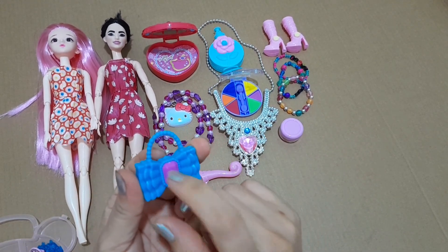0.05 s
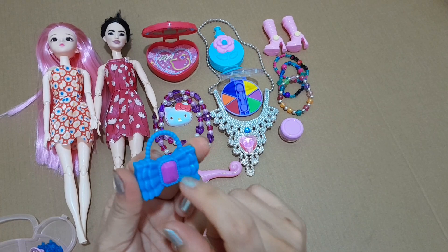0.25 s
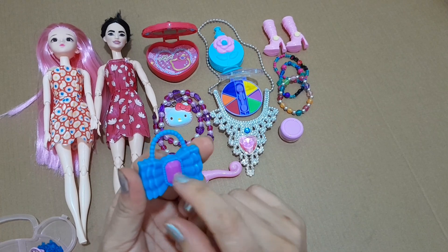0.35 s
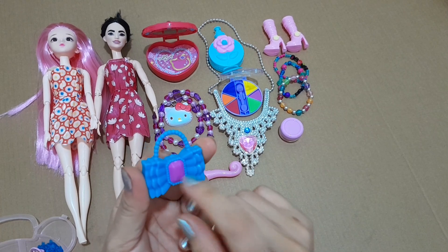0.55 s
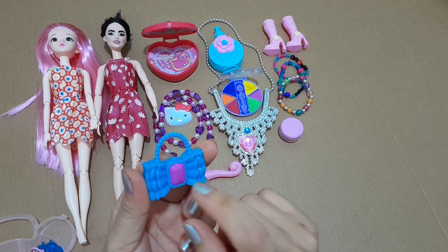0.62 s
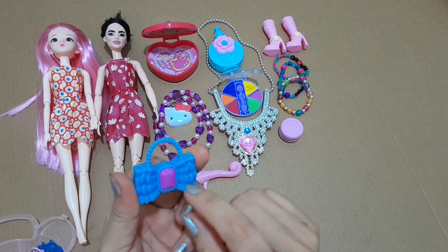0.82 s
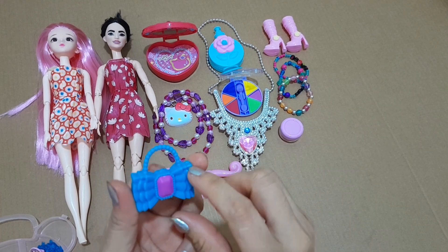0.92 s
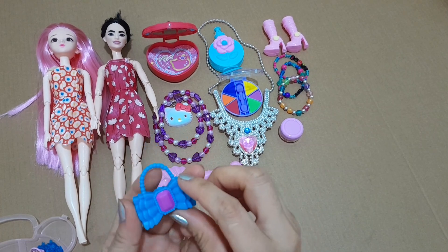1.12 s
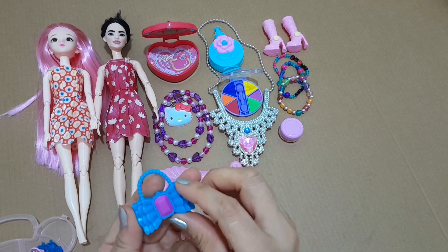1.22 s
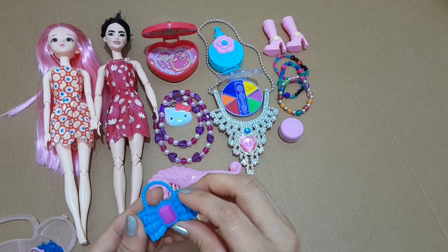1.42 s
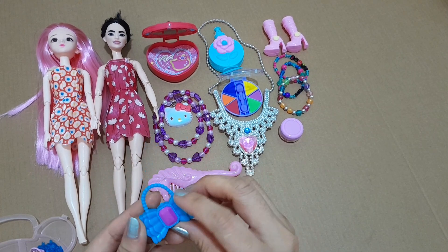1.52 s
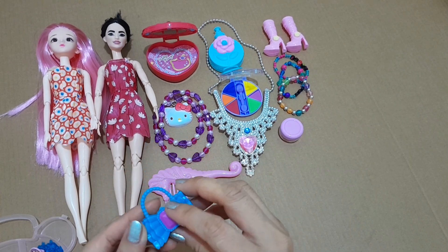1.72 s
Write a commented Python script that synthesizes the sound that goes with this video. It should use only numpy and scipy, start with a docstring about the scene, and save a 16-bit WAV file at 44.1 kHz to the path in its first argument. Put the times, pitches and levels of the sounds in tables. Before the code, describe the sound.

Four crisp fingernail clicks on a hard plastic toy handbag over soft room noise.

```python
"""Four sharp fingernail taps on a small hard plastic toy, close to a stereo microphone in a quiet, live room.
Each is a graze and a click that rings briefly near 4 kHz; a faint tick comes before them, and more follow
as the toy is turned in the fingers. Moving air buffets the two microphone ports separately.
Behind it all lie soft room noise, a drifting hollow band and a thin hiss."""
import sys
import numpy as np
from scipy import signal
from scipy.fft import rfft, irfft
from scipy.io import wavfile
from scipy.ndimage import uniform_filter1d

SR = 44100
rng = np.random.default_rng(int(sys.argv[2]) if len(sys.argv) > 2 else 0)


def unload_audio(sound):
    """Save the sound as a 16-bit wav file, at the path given as the first command line argument."""
    columns = np.transpose(np.atleast_2d(sound))
    # keep every value between -1 and 1, then stretch to whole-number steps
    steps = np.round(np.clip(columns, -1, 1) * 32767)
    wavfile.write(sys.argv[1], SR, steps.astype(np.int16))


N = 77175
TIME = np.arange(N) / SR


def amp(db):
    return 10 ** (np.asarray(db) / 20)


def unit_rms(x):
    return x / np.sqrt(np.mean(x ** 2) + 1e-20)


def at_hz(table, hz):
    """Reads a table on a log-frequency axis."""
    table_hz, value = np.transpose(table)
    return np.interp(np.log(hz + 1), np.log(table_hz + 1), value)


def envelope(table):
    """Gain over the scene from rows of (time [s], level [dB])."""
    return amp(np.interp(TIME, *np.transpose(table)))


def add(mix, start_s, sound):
    """Mixes a sound in, in place."""
    part = mix[max(round(start_s * SR), 0):][:len(sound)]
    part += sound[:len(part)]


def noise(spectrum):
    """Coloured noise of rms 1."""
    gain = amp(at_hz(spectrum, np.fft.rfftfreq(N, 1 / SR)))
    return unit_rms(irfft(rfft(rng.standard_normal(N)) * gain, N))


def impulse(gain_db):
    """The sharpest causal pulse with these dB per bin."""
    log_gain = np.log(amp(np.r_[gain_db, gain_db[-2:0:-1]]))
    return np.fft.ifft(np.exp(np.conj(signal.hilbert(log_gain)))).real


# Colour of the room tone all around the microphone: (frequency [Hz], relative level [dB])
ROOM_TONE_SPECTRUM = [(40, 6), (200, -6.5), (450, -0.5), (680, 3), (950, 0), (1300, 0), (1900, -6.5),
                      (2800, -18.5), (4500, -24), (9000, -26), (16000, -31)]
# Its gentle swells: (time [s], level [dB])
ROOM_TONE_LEVEL = [(0, -56), (.15, -60), (.28, -52.5), (.45, -56), (.75, -54), (.97, -56.5), (1.08, -56),
                   (1.19, -57.5), (1.4, -53.5), (1.55, -55.5), (1.75, -56.5)]
# Its likeness at the two ports: (frequency [Hz], correlation [-1..1])
ROOM_TONE_CORRELATION = [(100, 0.51), (300, 0.74), (650, 0.21), (1300, -0.69), (3000, 0.12), (7000, -0.14)]


def room_tone():
    """Wide, soft room noise, partly shared by left and right."""
    left, independent = noise(ROOM_TONE_SPECTRUM), noise(ROOM_TONE_SPECTRUM)
    likeness = np.clip(at_hz(ROOM_TONE_CORRELATION, np.fft.rfftfreq(N, 1 / SR)), -1, 1)
    right = irfft(likeness * rfft(left) + np.sqrt(1 - likeness ** 2) * rfft(independent), N)
    return envelope(ROOM_TONE_LEVEL) * np.array([left, right])


# Colour of the hiss in each channel: (frequency [Hz], relative level [dB])
HISS_SPECTRUM = [(500, -44), (3000, 10.5), (6000, -4), (8700, 1.5), (11000, -4.5), (15500, 4)]


def hiss(level_db=-72.5):
    """A thin steady hiss, independent left and right."""
    return amp(level_db) * np.array([noise(HISS_SPECTRUM), noise(HISS_SPECTRUM)])


# A hollow band within the room tone: (time [s], centre [Hz], level [dB])
DRONE_DRIFT = [(0, 700, -69), (.5, 618.4, -59.5), (0.851, 650, -78), (1.069, 517.7, -57), (1.2, 646, -79),
               (1.441, 860.7, -58.5), (1.55, 801, -68.5), (1.66, 702.5, -60.5), (1.75, 691, -75)]


def drone(width_hz=180):
    """A soft band of noise whose centre drifts, half shared by the two ports."""
    times, centre_hz, db = np.transpose(DRONE_DRIFT)
    carrier = np.exp(2j * np.pi * np.cumsum(np.interp(TIME, times, centre_hz)) / SR)
    lowpass = signal.butter(2, width_hz / 2, fs=SR)
    real, imag = signal.lfilter(*lowpass, rng.standard_normal((2, 3, N)))
    shared, left, right = ((real + 1j * imag) * carrier).real
    return envelope(np.c_[times, db]) * unit_rms(np.array([shared + left, shared + right]))


# Air right on the microphone, deep rumble and low flutter: (frequency [Hz], relative level [dB])
RUMBLE_SPECTRUM = [(15, -28), (35, -10), (60, 5), (85, 2.5), (115, -2), (170, -16), (250, -23.5),
                   (450, -32.5), (900, -34), (3000, -73)]
FLUTTER_SPECTRUM = [(80, -93), (170, -11.5), (320, 1), (500, -4.5), (800, -18), (1500, -26), (4000, -35)]
# Their strength at each port: (time [s], level [dB])
RUMBLE_LEFT_LEVEL = [(0, -37), (.05, -48), (.12, -80), (.21, -65), (.4, -63), (.52, -73), (.68, -59),
                     (.77, -42.5), (.86, -47), (1.09, -55.5), (1.17, -49), (1.3, -47), (1.37, -40),
                     (1.47, -53.5), (1.58, -60.5), (1.75, -59)]
RUMBLE_RIGHT_LEVEL = [(0, -79), (.14, -67), (.2, -33.5), (.26, -36.5), (.34, -35), (.4, -28.5),
                      (.52, -34.5), (.65, -40), (.76, -34.5), (.84, -44), (.94, -57.5), (1.08, -48),
                      (1.149, -74), (1.238, -38), (1.38, -47), (1.56, -48.5), (1.63, -71), (1.75, -58)]
FLUTTER_LEFT_LEVEL = [(0, -75), (.12, -68), (.18, -57.5), (.203, -40.5), (.24, -57.5), (0.407, -43.5),
                      (.46, -55.5), (.5, -52.5), (.57, -51), (.595, -49), (.64, -60), (0.731, -58.5),
                      (0.901, -64), (1.19, -81), (1.23, -55), (1.28, -69), (1.335, -58.5), (1.5, -64),
                      (1.75, -78)]
FLUTTER_RIGHT_LEVEL = [(0, -66), (.12, -99), (.2, -60), (.41, -55.5), (.65, -67), (.71, -54), (.79, -60.5),
                       (1.09, -67), (1.16, -73), (1.381, -63), (1.6, -94), (1.75, -94)]
# Puffs on one port: (time [s], level [dB], frequency [Hz], half length [s], port [0 left, 1 right])
AIR_PUFFS = [(.261, -21.5, 76.8, 0.015, 1), (.3, -27, 114, 0.0094, 1), (.395, -16, 78, 0.0097, 1),
             (.402, -33, 228, 0.0037, 0), (0.562, -38.5, 175, 0.01, 1), (.598, -27, 81, 0.0041, 0),
             (.6, -25.5, 79, 0.013, 1), (.698, -30.5, 176, 0.0034, 1), (0.707, -23, 76.6, 0.0072, 1),
             (.77, -34.5, 75, 0.013, 0), (.861, -32.5, 139, 0.0026, 1), (1.093, -38.5, 59.5, 0.011, 0),
             (1.089, -44, 57.7, 0.0094, 1), (1.345, -31, 86, 0.0068, 0), (1.378, -32, 128, 0.0073, 1)]


def air_buffeting():
    """Moving air makes separate low turbulence at each port, with a few stronger puffs."""
    out = np.zeros((2, N))
    levels = [(RUMBLE_LEFT_LEVEL, FLUTTER_LEFT_LEVEL), (RUMBLE_RIGHT_LEVEL, FLUTTER_RIGHT_LEVEL)]
    for channel, (rumble_level, flutter_level) in zip(out, levels):
        rumble = noise(RUMBLE_SPECTRUM)
        rumble /= np.sqrt(uniform_filter1d(rumble ** 2, 1300) + 0.069)  # evens out chance swells
        channel += envelope(rumble_level) * rumble + envelope(flutter_level) * noise(FLUTTER_SPECTRUM)
    for centre_s, db, hz, half_s, port in AIR_PUFFS:
        t = TIME - centre_s
        out[int(port)] -= amp(db) * np.exp(-(t / half_s) ** 2) * np.sin(2 * np.pi * hz * t)
    return out


# Skin on plastic, close to the microphone: (frequency [Hz], relative level [dB])
RUB_SPECTRUM = [(1500, 28), (3200, -10), (4100, 15), (6000, -24), (8700, 16), (12000, -42), (16000, -51)]
# Its strength as the toy is handled: (time [s], level [dB])
FINGER_RUB_LEVEL = [(0, -61), (.12, -70), (.3, -68.5), (.6, -89), (1.2, -76), (1.27, -62), (1.45, -70),
                    (1.75, -77)]


def finger_rub():
    """Fingertips slide over the toy with a faint friction noise."""
    return envelope(FINGER_RUB_LEVEL) * np.array([noise(RUB_SPECTRUM), noise(RUB_SPECTRUM)])


def treble_tilt(hz, db_per_octave, corner_hz=3970):
    """Treble lift or cut in dB above the shell's main ring."""
    return db_per_octave * np.log2(np.maximum(hz / corner_hz, 1))


# Decay of the live room: (frequency [Hz], t60 [s])
TAIL_T60 = [(500, 1), (4000, 0.33), (8000, 0.33), (16000, 0.33)]
# Colour of its tail at the microphone: (frequency [Hz], relative level [dB])
TAIL_COLOUR = [(1000, -4), (3100, 7), (3800, 0.5), (5500, -1), (8000, -2.5), (11000, 2.5), (15500, 4.5)]
# Reflections off surfaces near the toy: (nominal delay [s], gain [dB])
NEAR_ECHOES = [(.0034, -10.5), (.0062, -17), (0.0114, -24), (0.0135, -24)]


def path_to_port(tail_db, tail_tilt, lag_s=0, direct_db=0, shadow_tilt=0):
    """Impulse response from toy to one port: room tail, scatter off the hands, direct sound, echoes."""
    t = np.arange(SR // 2) / SR
    hz, frame_s, bands = signal.stft(rng.standard_normal(len(t)), SR, nperseg=256)
    bands *= amp(-60 * frame_s / at_hz(TAIL_T60, hz)[:, None])
    colour = amp(tail_db + at_hz(TAIL_COLOUR, hz) + treble_tilt(hz, tail_tilt))[:, None]
    opening = np.where(t < 0.012, amp(-4), 1)  # the tail is softer for its first 12 ms
    plain_tail, tail = opening * signal.istft(np.array([bands, colour * bands]), SR)[1][:, :len(t)]
    tail /= np.linalg.norm(plain_tail)
    scatter_db, scatter_decay_s, gap_s = -10, 0.0035, 0.0007
    scatter = rng.standard_normal(len(t)) * np.exp(-t / scatter_decay_s)
    scatter *= amp(scatter_db) / np.linalg.norm(scatter)
    path = (tail + scatter) * (t > gap_s)
    add(path, lag_s, impulse(direct_db + treble_tilt(hz, shadow_tilt)))
    for delay_s, db in NEAR_ECHOES:
        add(path, delay_s * rng.uniform(0.83, 1.04), amp([db]))
    return path


# The nail's click, right at the toy: (frequency [Hz], relative level [dB])
CLICK_SPECTRUM = [(300, -11), (1000, -12.5), (1700, -18.5), (2500, -12.5), (3150, -21), (3900, -1),
                  (4700, -3.5), (5500, -4), (7500, -4.5), (9000, -8), (12000, -14.5), (16000, -17.5)]
# Ring of the plastic shell: (nominal frequency [Hz], relative level [dB], t60 [s])
SHELL_MODES = [(3730, -44.5, 0.021), (3970, -32.5, 0.0098), (4370, -38.5, 0.011)]


def nail_contact(click_tilt, knock_db, ring_db, pitch, lead_s, graze_db, size=4096):
    """The nail grazes, then lands: a click, a hollow knock and a short ring pitched by the grip."""
    hz, t = np.fft.rfftfreq(size, 1 / SR), np.arange(size) / SR
    click = impulse(at_hz(CLICK_SPECTRUM, hz / pitch) + treble_tilt(hz, click_tilt))
    modes = [(f * pitch, db + ring_db, t60) for f, db, t60 in SHELL_MODES]
    modes.append((1743, knock_db - 36, 0.0083))  # the hollow of the toy
    hit = click + sum(amp(db - 60 * t / t60) * np.cos(2 * np.pi * f * t) for f, db, t60 in modes)
    contact = amp(graze_db) * hit  # the graze is a softer copy just ahead of the hit
    add(contact, lead_s, hit)
    return contact


# Four taps and three faint ticks close to the microphone, all levels relative:
# (time [s], level [dB], click tilt [dB/octave], knock [dB], ring [dB], pitch [ratio],
#  graze lead [s], graze [dB], room tail [dB], tail tilt [dB/octave])
NAIL_TAPS = [(0.0138, -27.5, 3, 0, 7.5, 0.96, .001, -3, 7, -1),
             (.1836, -1.5, -3, -3, 5.5, 1.023, .00025, -21, 0, 2),
             (0.359, 5.5, 1.7, 1, 0.5, 1.04, .00023, -14, -3, -0.5),
             (0.5315, 1, -2.2, -11, -8, 0.99, .002, -9, 1, 1.5),
             (0.7201, 5, 0, 3, -5, 0.992, .00028, -15.5, -1.5, 0.5),
             (.972, -31, -3, -4, -0.5, 1.0, .001, -8, -5, -2),
             (1.2615, -21.5, 0.5, 0, -5, 1.07, .00012, -3.5, 4, 0)]


def nail_taps(gain_db=-8.5, room_db=-1.5):
    """Each contact takes a slightly different way to the ports as the hands move; the right is farther."""
    out = np.zeros((2, N))
    for hit_s, db, click_tilt, knock_db, ring_db, pitch, lead_s, graze_db, tail_db, tail_tilt in NAIL_TAPS:
        contact = amp(gain_db + db) * nail_contact(click_tilt, knock_db, ring_db, pitch, lead_s, graze_db)
        left = path_to_port(room_db + tail_db, tail_tilt)
        right = path_to_port(room_db + tail_db, tail_tilt, lag_s=0.00018, direct_db=-1.5, shadow_tilt=-2)
        for channel, path in zip(out, (left, right)):
            add(channel, hit_s - lead_s, signal.fftconvolve(contact, path))
    return out


def scene():
    """The toy up close, air on the microphone and the quiet room behind."""
    return nail_taps() + finger_rub() + air_buffeting() + room_tone() + hiss() + drone()


def record(dry, cutoff_hz=15950):
    """The recorder's band limit."""
    lowpass = signal.firwin(511, cutoff_hz, window=("kaiser", 9), fs=SR)
    return signal.oaconvolve(dry, lowpass[None], "same")


dry = scene()
out = record(dry)
unload_audio(out)
```